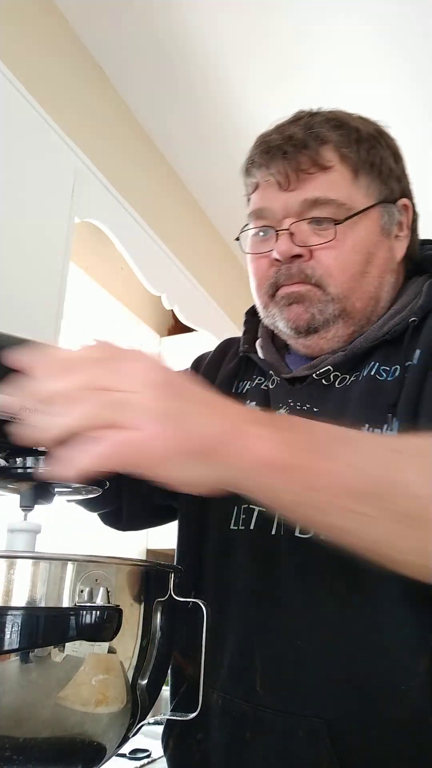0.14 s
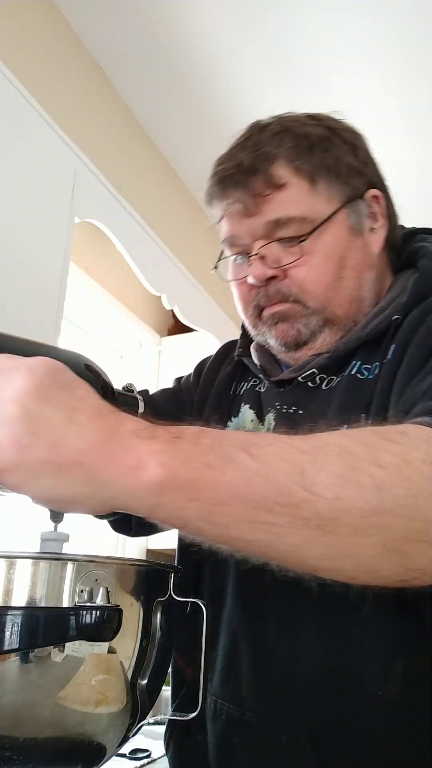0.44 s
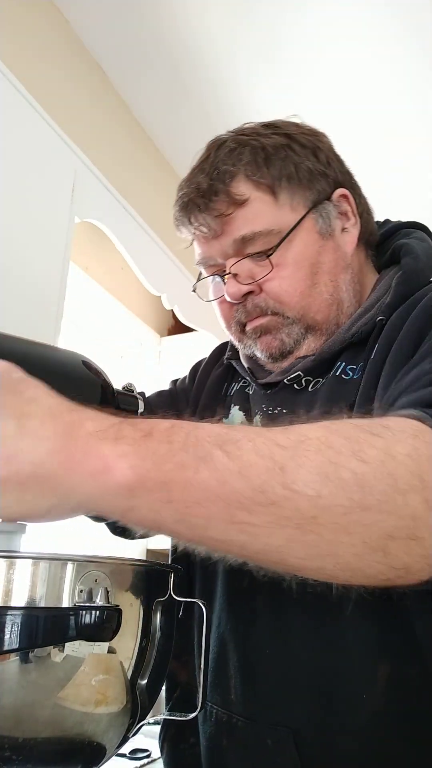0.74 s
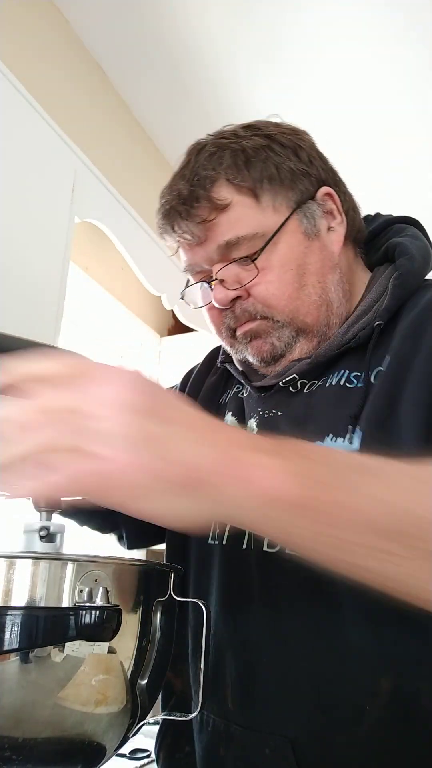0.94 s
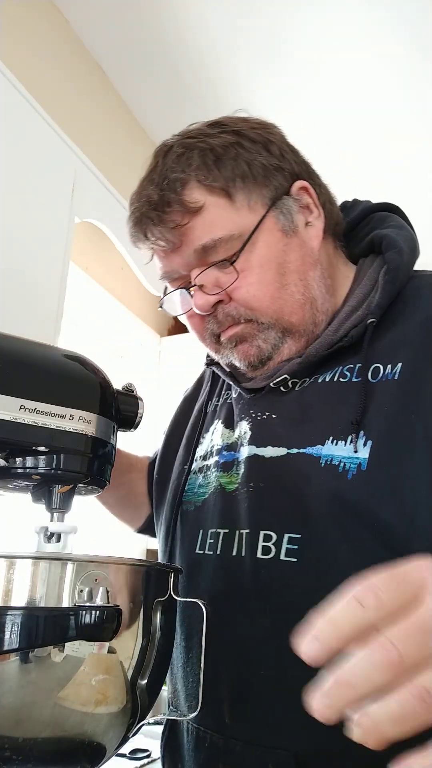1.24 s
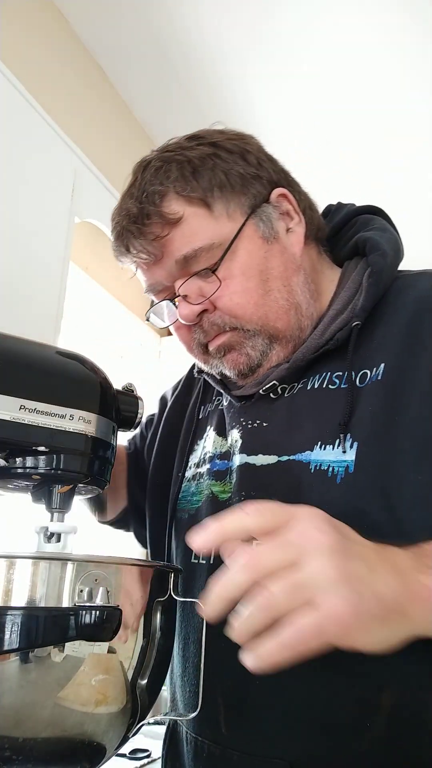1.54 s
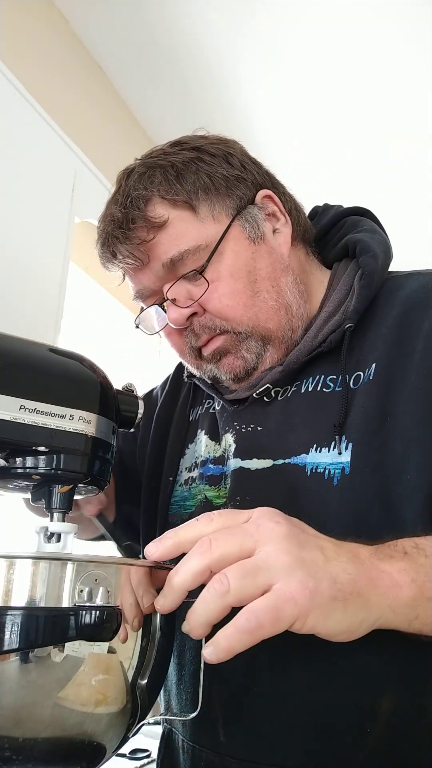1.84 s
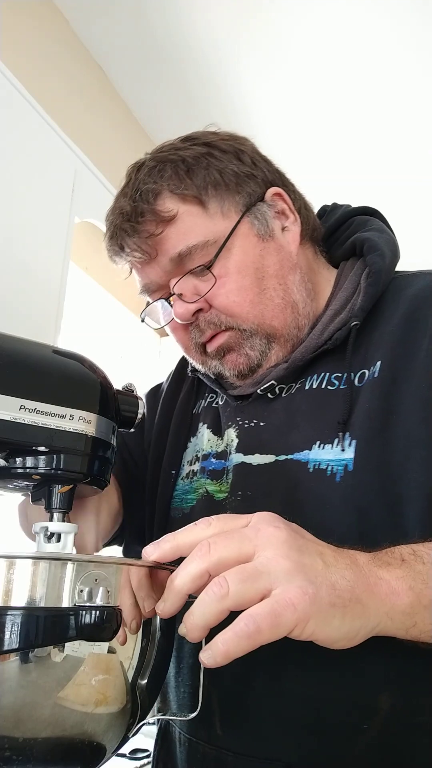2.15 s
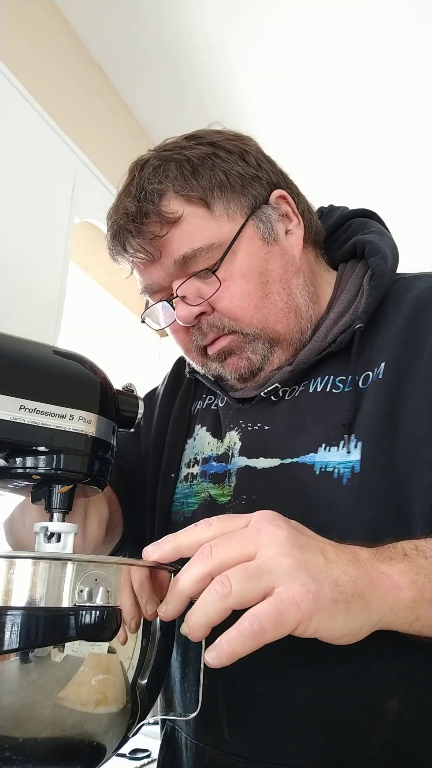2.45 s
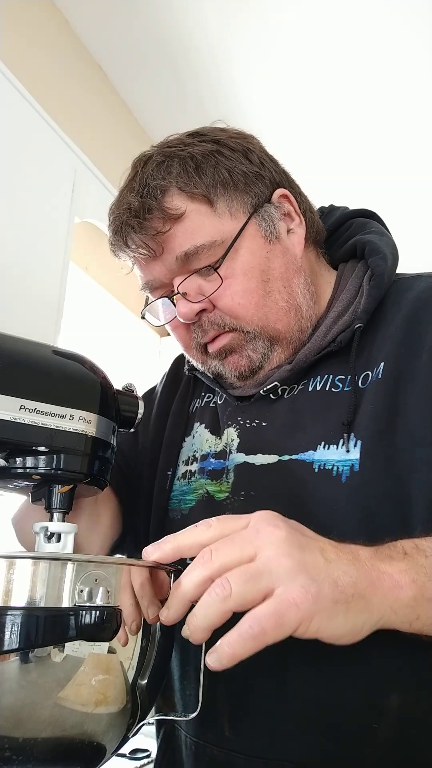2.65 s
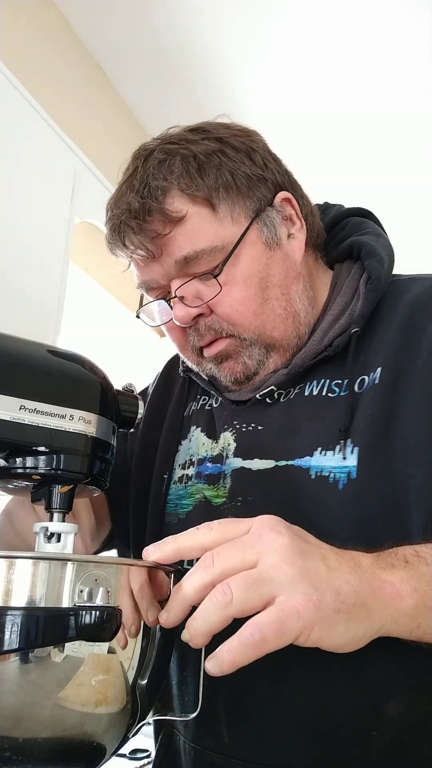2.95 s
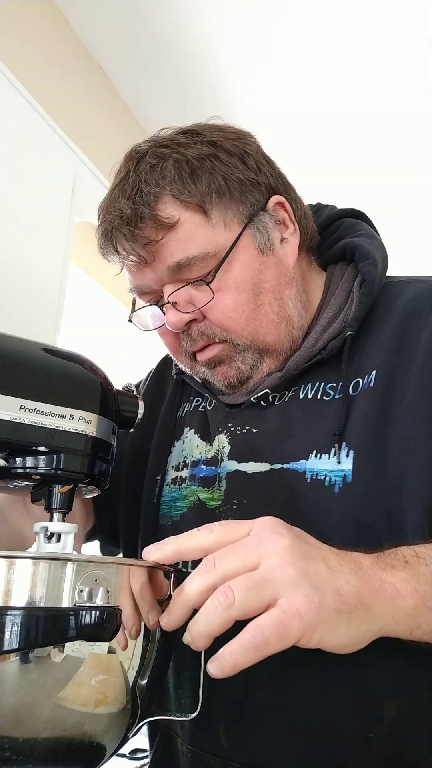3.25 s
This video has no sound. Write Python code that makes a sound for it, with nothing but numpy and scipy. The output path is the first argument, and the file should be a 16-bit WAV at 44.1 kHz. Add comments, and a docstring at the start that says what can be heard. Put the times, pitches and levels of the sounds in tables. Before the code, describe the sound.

In a kitchen, a nearby stand mixer runs with a gear whine and a few dull knocks, clicks off and falls in pitch to a stop. Faint taps and hand slides on the metal bowl follow.

```python
"""A stand mixer switches off

A mixer runs in a kitchen: its gears whine and rattle, its motor brushes sizzle, and a few
dull knocks sound. The speed lever snaps off and the gears rasp as the motor winds down.
Then hands knock softly on the steel bowl and slide over it, above a quiet mains hum."""
import sys
import numpy as np
from scipy import signal
from scipy.fft import rfft, irfft
from scipy.io import wavfile
from scipy.ndimage import uniform_filter1d

SR = 44100
rng = np.random.default_rng(int(sys.argv[2]) if len(sys.argv) > 2 else 0)


def waveform_to_disk(signal):
    """Save audio, clipped to [-1, 1], as 16-bit WAV at the path in sys.argv[1]."""
    frames = np.transpose(np.atleast_2d(signal))
    scaled = np.clip(frames, -1, 1) * 32767
    samples = np.round(scaled).astype(np.int16)
    wavfile.write(sys.argv[1], SR, samples)


N = 149940
T = np.arange(N) / SR
BINS_HZ = np.maximum(np.arange(N // 2 + 1) * SR / N, 1)
SWITCH_OFF_S = 0.7028
UNLOADED = np.interp(T, [SWITCH_OFF_S, 0.82], [0, 1])  # 0 under power, 1 when coasting freely
WHINE_JITTER = 0.0037  # unsteadiness as a share of the pitch


def amp(db):
    """Turn decibels into a gain."""
    return 10 ** (np.asarray(db) / 20)


def unit(x):
    """Scale a signal to an average (rms) level of 1."""
    return x / np.sqrt(np.mean(x ** 2) + 1e-20)


def curve(rows):
    """Join (time_s, value) points with straight lines."""
    return np.interp(T, *np.transpose(rows))


def per_bin(points):
    """Join (pitch_hz, value) points along a log-frequency axis."""
    hz, value = np.transpose(points)
    return np.interp(np.log(BINS_HZ), np.log(hz), value)


def drift(hz):
    """A random wobble of size about 1, mostly slower than hz."""
    return unit(irfft(rfft(rng.standard_normal(N)) / (1 + (BINS_HZ / hz) ** 2), N))


def pan(db):
    """Left and right gains; positive db leans left."""
    gains = amp(np.array([[0.5], [-0.5]]) * db)
    return gains / np.sqrt(np.mean(gains ** 2, axis=0))


def noise(colour, likeness=0, pan_db=0):
    """Coloured stereo noise; likeness is 1 for matching sides, 0 for unrelated, -1 for opposite."""
    mid, side = rfft(rng.standard_normal((2, N)))
    likeness = np.clip(likeness, -0.99, 0.99)
    pair = np.sqrt(1 + likeness) * mid + np.sqrt(1 - likeness) * side * [[1], [-1]]
    return unit(irfft(pair * amp(per_bin(colour)) * pan(pan_db), N))


def resonate(x, hz, width_hz):
    """Let through the part of a sound near one pitch."""
    r = np.exp(-np.pi * width_hz / SR)
    feedback = [1, -2 * r * np.cos(2 * np.pi * hz / SR), r * r]
    return signal.lfilter(np.array([1, 0, -1]) * (1 - r * r) / 2, feedback, x + 1e-18)


def band(x, hz, width_hz):
    """Resonate twice for a cleaner band, scaled to level 1."""
    return unit(resonate(resonate(x, hz, width_hz), hz, width_hz))


def decay(start_s, fade_s):
    """Jump to 1, then fall 60 dB every fade_s."""
    return (T >= start_s) * np.exp(-np.log(1000) * np.maximum(T - start_s, 0) / fade_s)


def kitchen(x, echo_db, fade_s=0.32):
    """Add the room's wash of echoes, different at each ear."""
    tail = (rng.standard_normal((2, N)) * decay(0.0078, fade_s))[:, :SR]
    tail /= np.sqrt(np.sum(tail ** 2, axis=1, keepdims=True))
    return x + amp(echo_db) * signal.fftconvolve(np.atleast_2d(x), tail, axes=1)[:, :N]


def turning(hz, jitter, jitter_hz=70):
    """The angle of a slightly unsteady rotation."""
    return 2 * np.pi * np.cumsum(hz * (1 + jitter * drift(jitter_hz))) / SR


# Motor speed, given as the pitch of the gear whine: time_s, pitch_hz
MOTOR_SPEED = [(0, 952), (.075, 949), (.14, 981), (.22, 982), (.26, 963), (.365, 952), (.425, 902),
               (.57, 909), (.62, 887), (.675, 908), (.716, 946), (.76, 860), (.848, 664), (.92, 563),
               (1.026, 405), (1.08, 300), (1.2, 140), (1.29, 3)]
# Loudness of the whine and of its octave: time_s, level_db
WHINE_LEVEL = [(0, -25.5), (.1, -36), (.135, -22.5), (.17, -32.5), (.22, -26.5), (.31, -32), (.39, -28),
               (.42, -21), (.52, -27.5), (.63, -28), (.68, -30.5), (.78, -22.5), (.88, -30.5), (.922, -22),
               (.952, -37.5), (1.015, -25.5), (1.054, -52.5), (1.25, -85)]
OCTAVE_LEVEL = [(0, -39), (.38, -36.5), (.62, -32), (.72, -32), (.84, -33), (.9, -43.5), (.96, -35.5),
                (1.04, -49), (1.09, -38), (1.16, -64.5)]


def gear_whine(hz):
    """Meshing teeth sing a tone that throbs with the slower gears, plus its octave."""
    teeth_per_throb, throb_depth_db, left_lag_s = 45, 3.2, 0.00019
    jitter = WHINE_JITTER + 0.018 * UNLOADED  # unloaded teeth chatter in their gaps
    phase = turning(hz, jitter) - 2 * np.pi * hz * np.array([[left_lag_s], [0]])
    throb_db = throb_depth_db * np.cos(phase / teeth_per_throb) * (T < SWITCH_OFF_S)
    tone = amp(curve(WHINE_LEVEL) + throb_db + 2.5 * drift(71)) * np.sin(phase) * pan(-5.5)
    octave = amp(curve(OCTAVE_LEVEL) + 2 * drift(35)) * np.sin(2 * phase)
    moving = T < MOTOR_SPEED[-1][0]
    return kitchen((tone + octave) * moving, echo_db=-7.5)


# Tones of the turning shaft: multiple_of_shaft_speed, level_db
SHAFT_TONES = [(1, -59.5), (2, -44.5), (3, -54.5), (4, -60.5)]
# Pitches at which the housing rings: pitch_hz, width_hz, level_db
HOUSING_RINGS = [(181.8, 14.5, -51.5), (240.8, 8.5, -49.5), (291.3, 12, -45), (357.2, 6, -42.5),
                 (411.5, 8.8, -51.5), (579, 34, -50), (1382, 29, -52.5), (5650, 600, -63.5)]


def shaft_and_housing(hz, slowing):
    """The shaft drones and the shaken housing rings; both fade as the motor slows."""
    teeth, fall_db = 5, 56.5
    phase = turning(hz / teeth, jitter=0.021)
    shaft = sum(amp(db + drift(21)) * np.sin(k * phase) for k, db in SHAFT_TONES)
    housing = sum(amp(db) * band(rng.standard_normal(N), pitch, width)
                  for pitch, width, db in HOUSING_RINGS)
    return kitchen((shaft + housing) * amp(fall_db * slowing) * pan(-4.5), echo_db=-12)


# Tone colour of rubbing gears and brushes: pitch_hz, relative_db
FRICTION_COLOUR = [(40, -35.5), (64, -17.5), (263, -19.5), (380, -8), (693, -17), (900, -5.5), (1260, -20),
                   (1860, -15.5), (2220, -20.5), (2900, -21.5), (3390, -24.5), (5700, -22), (6500, -27.5),
                   (7350, -29), (8100, -21.5), (11000, -19), (12700, -19.5), (15000, -32.5)]
# How alike it is on both sides: pitch_hz, likeness
FRICTION_LIKENESS = [(60, 1), (290, 1), (640, 0.68), (1410, 0.0289)]
# Which way it leans: pitch_hz, left_minus_right_db
FRICTION_BALANCE = [(60, -9), (120, 2.5), (240, 5), (480, -5.5), (950, -6), (1890, 0), (3770, 2.5),
                    (7520, -5), (15000, -13)]


def friction(hz, slowing):
    """A rough rattle, and a high sizzle that pulses with the teeth and fades sooner."""
    split_hz, rattle_fall_db, sizzle_fall_db = 7000, 26.5, 34
    rubbing = noise(FRICTION_COLOUR, per_bin(FRICTION_LIKENESS), per_bin(FRICTION_BALANCE))
    low = irfft(rfft(rubbing) / (1 + (BINS_HZ / split_hz) ** 10), N)
    rattle = low * amp(-31.5 + rattle_fall_db * slowing + 1.5 * drift(79))
    sizzle = (rubbing - low) * amp(-34 + sizzle_fall_db * slowing + 1.5 * drift(119.1))
    tooth_pulse = 1 + 0.17 * np.sin(turning(hz, WHINE_JITTER))
    return kitchen(rattle + sizzle * tooth_pulse, echo_db=-6, fade_s=0.25)


# High tones of the motor's sliding contacts: multiple_of_whine_pitch, level_db
BRUSH_TONES = [(11, -48.5), (12, -40.5), (13, -42.5), (14, -51.5)]


def brushes(hz):
    """Brush tones ring through motor and casing; without power they blur into a fading whirr."""
    jitter, fade_db_per_s = 0.006 + 0.037 * UNLOADED, 21.5
    tones = sum(amp(db + 4.1 * drift(48.77)) * np.sin(k * turning(hz, jitter, jitter_hz=300))
                for k, db in BRUSH_TONES)
    motor = resonate(tones, hz=10600, width_hz=3000) + 2 * resonate(tones, hz=11754, width_hz=180)
    casing = amp(-3) * resonate(tones, hz=5400, width_hz=1100)
    fade = amp(-fade_db_per_s * np.maximum(T - SWITCH_OFF_S, 0))
    return kitchen((motor * pan(-17) + casing * pan(-2)) * fade, echo_db=-2.5, fade_s=0.25)


# Hum of the mains and a distant appliance: pitch_hz, level_db
HUM_TONES = [(60, -77.5), (120, -70), (240, -75.5), (455, -75), (707, -75.5)]
# Tone colour of the kitchen air: pitch_hz, relative_db
AIR_COLOUR = [(40, -21), (60, -9), (86, -24), (122, -4), (206, -11), (291, -7), (382, -15), (454, -3),
              (643, -15), (845, -15.5), (2110, -26.5), (5700, -28.5), (7500, -33.5), (15000, -32)]
# How alike it is on both sides: pitch_hz, likeness
AIR_LIKENESS = [(60, 0.26), (180, 1), (550, 0.62), (1650, -0.51), (4970, 0.087), (15000, -0.23)]


def room_tone():
    """Quiet kitchen air and a steady electric hum."""
    hum = sum(amp(db) * np.sqrt(2) * np.sin(2 * np.pi * (hz * T + rng.random())) for hz, db in HUM_TONES)
    return hum + amp(-61) * noise(AIR_COLOUR, per_bin(AIR_LIKENESS), pan_db=-1.12)


def blows(starts_s, levels_db, fade_s):
    """The loudness of several dying blows, added up."""
    return sum(amp(db) * decay(start, fade_s) for start, db in zip(starts_s, levels_db))


# Soft knocks on mixer and bowl: start_s, thud_db, ring_db, boom_db
KNOCKS = [(0.149, -49, -70, -39.5), (.215, -35.5, -70, -41.5), (0.363, -39.5, -68, -40),
          (0.574, -37.5, -70, -44), (1.891, -45.5, -51.5, -51.5), (2.805, -50, -37.5, -59.5),
          (2.889, -53, -50, -80), (2.943, -52, -57.5, -79), (3.11, -45.5, -67.5, -72.5),
          (3.306, -47, -56.5, -61.5)]
# Tone colours of a thud and of the loose bowl in its seat: pitch_hz, relative_db
THUD_COLOUR = [(70, -44.5), (160, 8.5), (260, -7), (480, -3), (800, -16), (2000, -45.5)]
CLATTER_COLOUR = [(200, -6), (900, -1.5), (1400, -6.5), (1900, -10), (4500, -25.5)]


def knocks():
    """Each knock thuds, makes the counter boom, and sets the bowl clacking, scraping and ringing."""
    starts, thud_db, ring_db, boom_db = np.transpose(KNOCKS)
    thud_level = uniform_filter1d(blows(starts, thud_db, fade_s=0.25), size=150)  # softens each start
    thuds = noise(THUD_COLOUR, likeness=0.94, pan_db=-2) * thud_level
    boom_level = uniform_filter1d(blows(starts, boom_db, fade_s=0.32), size=600)
    booms = band(rng.standard_normal(N), hz=66.6, width_hz=45) * boom_level
    clack = blows(starts, ring_db - 7, fade_s=0.017)
    scrape = blows(starts, ring_db - 11.5, fade_s=0.4) * amp(-drift(140))
    clatter = noise(CLATTER_COLOUR, likeness=0.55, pan_db=-1.92) * (clack + scrape)
    ring = kitchen(bowl_ring(starts, ring_db) * pan(-2.6), echo_db=1, fade_s=0.25)
    return thuds + booms + clatter + ring


# Notes of the steel bowl: pitch_hz, relative_db
BOWL_NOTES = [(537, -9.5), (800, -8), (1034, -5), (1233, -11.5), (1370, -1.5), (1600, -17.5), (2660, -18)]


def bowl_ring(starts_s, levels_db, fade_s=0.05, detune=0.012):
    """The hand muffles the bowl's notes and shifts them a little at every knock."""
    out, t = np.zeros(N + SR), T[:SR // 10]
    hz, note_db = np.transpose(BOWL_NOTES)
    for start, db in zip(starts_s, levels_db):
        pitches = hz * (1 + detune * rng.uniform(-1, 1, len(hz)))
        gains = amp(db + note_db) * rng.choice([-1, 1], len(hz))
        ring = gains @ np.sin(2 * np.pi * np.outer(pitches, t))
        out[int(start * SR) + np.arange(len(t))] += ring * np.exp(-np.log(1000) * t / fade_s)
    return out[:N]


# Tone colour of the lever's snap: pitch_hz, relative_db
SNAP_COLOUR = [(4200, -24), (5500, 0), (7000, -25), (8000, -4), (11000, 0.5), (15500, -2.5)]


def lever_snap():
    """The speed lever snaps off with a short, bright burst."""
    snap = noise(SNAP_COLOUR, likeness=1) * amp(-4) * decay(SWITCH_OFF_S, fade_s=0.008)
    return kitchen(snap * pan(-10), echo_db=-5.5, fade_s=0.2)


# Loudness of the coasting gears: time_s, level_db
RASP_LEVEL = [(.72, -41), (.85, -44), (1.0, -45.5), (1.17, -53.5), (1.24, -60.5), (1.3, -82)]
# Pitches at which they ring: pitch_hz, width_hz, relative_db
RASP_RINGS = [(1494, 370, 4.5), (1920, 470, 0), (5900, 1100, -4.5)]


def coasting_gears(hz):
    """Unloaded gears rasp once per tooth as they run down."""
    teeth = rng.standard_normal((2, N)) * (1 + np.sin(turning(hz, jitter=0.0225))) ** 2
    rasp = sum(amp(db) * band(teeth, pitch, width) for pitch, width, db in RASP_RINGS)
    return kitchen(unit(rasp) * amp(curve(RASP_LEVEL)) * (T > SWITCH_OFF_S), echo_db=-5)


# Small ticks of lever and bowl: start_s, level_db, pitch_hz
TICKS = [(1.271, -45.5, 10450), (1.269, -50.5, 5370), (2.026, -53, 3770), (2.026, -54, 9920),
         (2.86, -50, 10400), (2.888, -61, 10500), (2.901, -56, 10400), (2.936, -61, 12000)]


def ticks():
    """Tiny contacts each give a bright pinch of noise."""
    out = np.zeros((2, N))
    for start, db, hz in TICKS:
        ring = unit(resonate(rng.standard_normal((2, N)), hz, width_hz=hz / 3))
        out += amp(db) * ring * decay(start, fade_s=0.027)
    return kitchen(out * pan(-8), echo_db=-5, fade_s=0.25)


# Strokes of a hand over the steel: start_s, end_s, level_db
STROKES = [(2.04, 2.159, -60), (2.404, 2.509, -61.5), (2.702, 2.813, -59), (2.85, 2.944, -57.5),
           (3.034, 3.167, -63), (3.32, 3.4, -58)]
# Tone colour of the rubbing: pitch_hz, relative_db
RUB_COLOUR = [(500, 5.5), (1500, -5), (3000, -8), (5500, -1), (7500, -1), (10300, 4), (12000, 1),
              (15500, -2)]
# Loudness of a thin, high hiss: time_s, level_db
HISS_LEVEL = [(2.38, -97.5), (2.46, -69), (2.9, -70.5), (3.22, -72.5), (3.33, -91)]


def hand_slides(rise_s=0.033, fade_s=0.31):
    """A hand rubs the bowl in short strokes, with a thin hiss running beneath them."""
    pressure = sum(amp(db) * np.clip((T - start) / rise_s, 0, 1) * ((T < end) + decay(end, fade_s))
                   for start, end, db in STROKES)
    rub = noise(RUB_COLOUR) * pressure * amp(1.5 * drift(68))
    hiss = band(rng.standard_normal((2, N)), hz=10200, width_hz=1100) * amp(curve(HISS_LEVEL))
    return (rub + hiss) * pan(-6)


def scene():
    """One motor speed drives the mixer's layers; the handling and the room are added."""
    hz = curve(MOTOR_SPEED)
    slowing = np.log10(hz / hz[0])  # -1 at a tenth of the speed, where a layer has lost its fall_db
    mixer = gear_whine(hz) + shaft_and_housing(hz, slowing) + friction(hz, slowing)
    mixer += brushes(hz) + coasting_gears(hz)
    return mixer + lever_snap() + ticks() + knocks() + hand_slides() + room_tone()


def record(dry, low_cut_hz=59, high_cut_hz=15750):
    """The microphone drops the deepest bass; the highest treble is cut steeply."""
    dry = signal.sosfilt(signal.butter(4, low_cut_hz, "high", fs=SR, output="sos"), dry)
    return signal.sosfilt(signal.ellip(10, 0.1, 70, high_cut_hz, fs=SR, output="sos"), dry)


dry = scene()
out = record(dry)
waveform_to_disk(out)
```